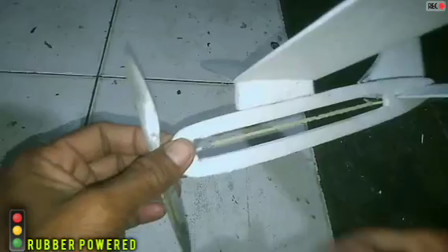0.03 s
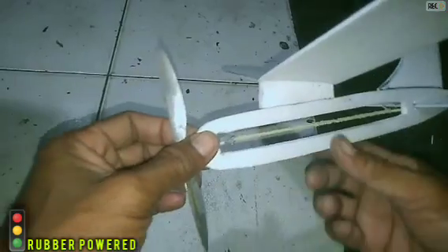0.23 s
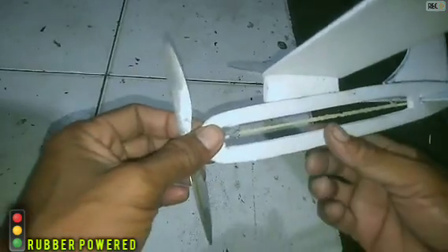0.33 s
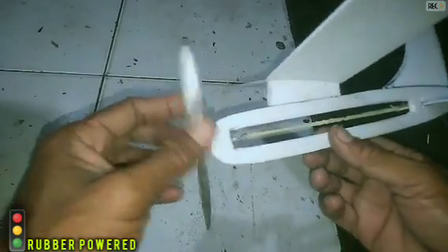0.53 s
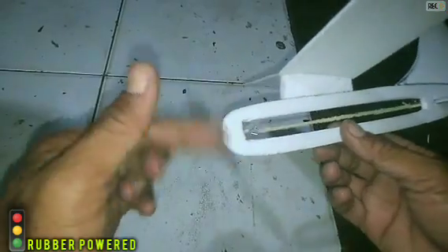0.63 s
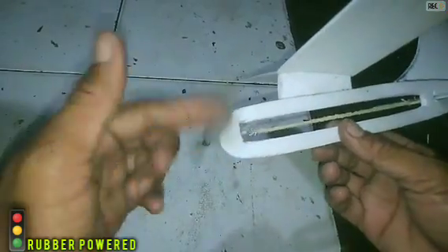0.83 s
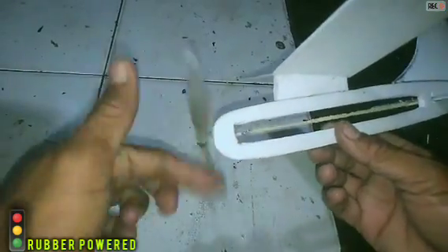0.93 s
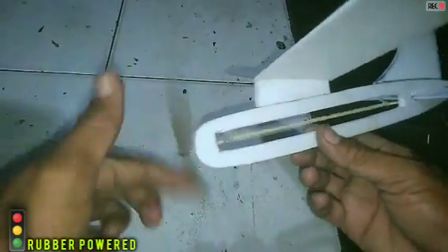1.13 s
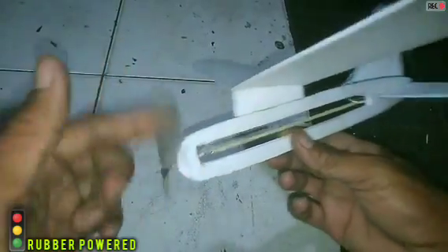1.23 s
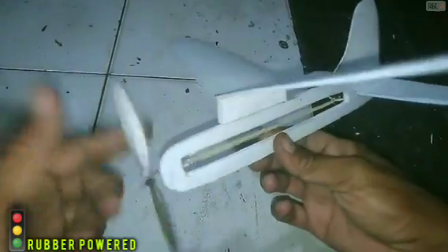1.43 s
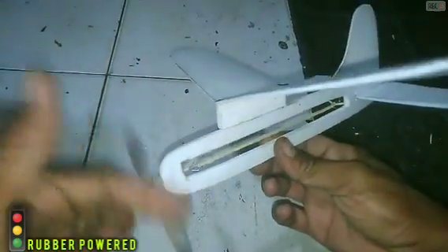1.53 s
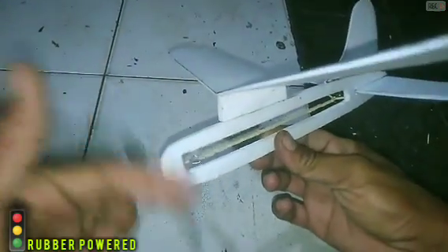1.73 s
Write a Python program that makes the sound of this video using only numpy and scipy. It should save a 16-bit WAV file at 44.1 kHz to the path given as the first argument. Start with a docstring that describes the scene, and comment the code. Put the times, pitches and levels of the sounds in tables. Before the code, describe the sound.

A small plastic propeller is flicked with short dry taps, close up in a quiet room. A tiny squeak and a deep handling bump come first, then fingers rub and the foam body briefly creaks around 0.6 seconds. The clearest taps land at about 0.75 and 1.4 seconds, with softer ones near 1.0, 1.2 and 1.7. Light finger rustles run between them over faint hiss.

```python
"""Flicking a foam plane's propeller

A small foam model plane is held close over a tiled floor in a quiet room. A finger flicks the plastic
propeller: short dry taps with a floor echo. Fingers slip and rustle on the foam body, the nose creaks
and the shaft gives one tiny squeak. Handling sends a subsonic bump through the faintly hissing mic."""
import sys
import numpy as np
from scipy import signal
from scipy.fft import rfft, irfft
from scipy.io import wavfile

SR = 44100
rng = np.random.default_rng(int(sys.argv[2]) if len(sys.argv) > 2 else 0)


def dump(signal):
    """Clip the signal to [-1, 1] and save it as 16-bit WAV at the path in sys.argv[1]."""
    limited = np.clip(np.atleast_2d(signal).T, -1, 1)
    pcm = np.round(limited * 32767).astype(np.int16)
    wavfile.write(sys.argv[1], SR, pcm)


N = 79380
T = np.arange(N) / SR


def from_db(db):
    """Decibels to gain."""
    return 10 ** (np.asarray(db) / 20)


def unit_rms(x):
    """Scale to an rms of 1."""
    return x / np.sqrt(np.mean(x ** 2) + 1e-20)


def cut(x, hz, kind="low", order=1):
    """Butterworth low- or high-pass."""
    return signal.sosfilt(signal.butter(order, min(hz, .45 * SR), kind, fs=SR, output="sos"), x)


def colour(x, spectrum):
    """Shape a steady noise with an EQ curve of (Hz, dB) points; rms 1."""
    hz, db = np.transpose(spectrum)
    bins = np.maximum(np.fft.rfftfreq(N, 1 / SR), 1)
    gain = from_db(np.interp(np.log(bins), np.log(hz), db))
    return unit_rms(irfft(rfft(x) * gain, N))


def ring(x, hz, t60):
    """One resonant mode that dies by 60 dB in t60 seconds."""
    radius, angle = np.exp(-np.log(1000) / (t60 * SR)), 2 * np.pi * hz / SR
    return signal.lfilter([.5, 0, -.5], [1, -2 * radius * np.cos(angle), radius ** 2], x + 1e-18)


def friction(slips_per_s=8500, spread_db=3.5):
    """Dense tiny slips of uneven size; rms 1."""
    sizes = from_db(spread_db * np.minimum(rng.exponential(1, N), 3)) * rng.choice([-1, 1], N)
    return unit_rms(sizes * (rng.random(N) < slips_per_s / SR))


# The noise bed's EQ. Each row: frequency in Hz, relative level in dB.
ROOM_TONE_EQ = [(20, -8.5), (60, -1), (105, -9), (150, -0.5), (210, -14), (420, -13), (800, -13),
                (1300, -17.5), (1900, -16), (2700, -18.5), (3600, -22.5), (6000, -31.5), (15000, -31)]


def room_tone():
    """Room rumble, microphone hiss and a faint steady whir in two narrow bands."""
    whir = 0
    for hz, width_hz, drive_db in [(2199, 49, 6), (2360, 23.4, -0.5)]:
        whir += from_db(drive_db) * ring(rng.standard_normal(N), hz, np.log(1000) / (np.pi * width_hz))
    air = colour(rng.standard_normal(N), ROOM_TONE_EQ)
    return from_db(-57.5) * air + from_db(-65.5) * unit_rms(whir)


# The handling rumble's fader. Each row: time in seconds, level in dB.
RUMBLE_FADER = [(0, -85), (.11, -86), (.16, -59.5), (.6, -56), (1.0, -57.5), (1.2, -59.5), (1.5, -64),
                (1.8, -57)]
# The slow drift of the microphone's zero. Each row: time in seconds, offset as a linear amplitude.
ZERO_DRIFT = [(0, -0.00016), (.14, 0.00079), (.45, -0.0052), (.62, -0.0012), (.8, 0.0017), (1.05, 0.0011),
              (1.4, -.002), (1.8, .001)]


def handling_noise(start_s=0.15, rise_s=0.023, fall_s=0.1):
    """Handling puts one subsonic bump and a low rumble on the microphone's drifting zero."""
    age = np.maximum(T - start_s, 0)
    bump = from_db(-20) * (1 - np.exp(-(age / rise_s) ** 2)) * np.exp(-age / fall_s)
    fader = from_db(np.interp(T, *np.transpose(RUMBLE_FADER)))
    rumble = fader * unit_rms(cut(rng.standard_normal(N), hz=92, order=2))
    return bump + rumble + np.interp(T, *np.transpose(ZERO_DRIFT))


# The bounce off the tiles. Each row: delay in seconds, level in dB against the direct sound.
FLOOR_ECHO = [(.0073, -26.5)]


def room(x, t60=0.22):
    """The floor throws back one close echo and the room adds a weak, dull tail."""
    echo = sum(from_db(db) * np.interp(T - delay, T, x, left=0) for delay, db in FLOOR_ECHO)
    tail = cut(rng.standard_normal(N) * np.exp(-np.log(1000) * T / t60), hz=2970)
    return x + echo + from_db(-21) * signal.fftconvolve(x, tail / np.linalg.norm(tail))[:N]


# The foam body's modes. Each row: frequency in Hz, relative level in dB, ring time (t60) in seconds,
# relative level in dB when the nose creaks.
FOAM_MODES = [(274, -3, 0.017, -17), (539.4, -6.5, 0.058, -20), (765, -5.5, 0.041, -30),
              (1158, -4.5, 0.043, 0.5), (1565, 0.5, 0.011, 0), (1789, 2, 0.0049, -7),
              (2092, 1.5, 0.0073, 0.5), (2520, -6, 0.018, -16), (2968, -11, 0.046, -8),
              (3013, -24, .035, -3), (3790, -15.5, 0.077, -10.5), (4190, -35, 0.07, -8.5),
              (4450, -20, 0.07, -20)]


def foam_body(x):
    """Slips ring the body's modes, and the soft foam passes little treble."""
    click = np.arange(N) == 0
    modes = sum(from_db(db) * ring(click, hz, t60) for hz, db, t60, _ in FOAM_MODES)
    knock = cut(modes, hz=4750, order=2)
    return signal.fftconvolve(x, knock / np.linalg.norm(knock))[:N]


def shaft_squeak(hz=786, end_s=0.017, release_s=0.007):
    """A short stick-slip note with a little rasp, stopping as the shaft comes to rest."""
    held = np.clip((end_s - T) / release_s, 0, 1)
    rasp = from_db(-12) * foam_body(held * friction())
    return from_db(-40.5) * (held * np.sin(2 * np.pi * hz * T) + rasp)


# The EQ of the creak's dry hiss. Each row: frequency in Hz, relative level in dB.
CREAK_HISS_EQ = [(1000, 6.5), (2500, 11.5), (4300, 11.5), (5600, 4), (8000, -3.5), (9100, 7), (10100, -2.5),
                 (12300, -1.5), (13500, -8), (14500, 2), (15800, -3.5)]


def nose_creak(start_s=0.5918, length_s=0.013, grip_s=0.0044, release_s=0.0053, waver_depth=0.0072):
    """As the pinch slides off the nose, gritty friction takes hold, makes the foam sing and lets go."""
    age = np.maximum(T - start_s, 0)
    release = np.exp(-np.maximum(age - length_s, 0) / release_s)
    singing = (1 - np.exp(-age / grip_s)) * release
    sliding = singing * release  # the friction dies twice as fast as the tone
    voice = 0
    for hz, _, _, db in FOAM_MODES:
        waver = waver_depth * unit_rms(cut(rng.standard_normal(N), hz=200, order=2))
        voice += from_db(db) * np.sin(2 * np.pi * np.cumsum(hz * (1 + waver)) / SR)
    slips = friction()
    grit = from_db(-40.5) * foam_body(sliding * slips)
    hiss = from_db(-42) * sliding * colour(slips, CREAK_HISS_EQ)
    return from_db(-40) * singing * voice + grit + hiss


# Skin rubbing on foam and blade. Each row: peak time, rise and fall in seconds, foam send in dB,
# dry hiss send in dB, rasp pitch in Hz, rasp send in dB.
RUB_CUES = [(0.552, 0.0085, 0.0089, -12, -33, 2060, -8.5), (0.5853, 0.0055, 0.0039, -7.5, -30, 2880, -10),
            (0.649, 0.01, 0.01, -22, -23, 2140, -25), (0.698, 0.011, 0.0075, -15.5, -11.5, 2800, -10.5),
            (0.875, 0.029, 0.016, -16.5, -14.5, 4386, -23.5),
            (0.906, 0.0093, 0.0064, -14.5, -22, 2620, -8.5), (0.979, 0.011, 0.01, -16.5, -19, 1423, -17),
            (1.078, 0.0056, 0.004, -22, -7.5, 4400, -18), (1.080, 0.013, 0.0054, -17.5, -16.5, 1565, -15),
            (1.096, 0.0067, 0.0079, -15, -8.5, 2900, -14), (1.160, 0.021, 0.018, -21.5, -18, 8750, -25.5),
            (1.276, 0.0024, 0.0085, -16.5, -24, 2700, -17.5), (1.452, 0.017, 0.022, -23, -26, 1700, -25),
            (1.541, 0.018, 0.011, -16.5, -12.5, 2700, -20), (1.618, 0.0084, 0.0058, -21, -17, 2680, -19),
            (1.647, 0.0055, 0.0087, -19.5, -17, 1660, -11), (1.775, 0.014, 0.0099, -22, -37, 2780, -22)]
# The EQ of the skin's dry hiss. Each row: frequency in Hz, relative level in dB.
SKIN_HISS_EQ = [(300, 2), (1500, -5), (3700, -5), (4450, 12), (5400, -2), (7500, 3), (9200, 7),
                (10300, 5.5), (12300, 2), (13600, -1), (14400, 4), (16000, -8)]


def finger_rubs(rasp_cycles=36):
    """Each rub swells and fades; its slips ring the foam, rasp at one pitch and crackle at the skin."""
    force, hiss, rasp = np.zeros((3, N))
    slips = friction()
    for peak_s, rise_s, fall_s, foam_db, hiss_db, hz, rasp_db in RUB_CUES:
        stroke = np.exp(-((T - peak_s) / np.where(T < peak_s, rise_s, fall_s)) ** 2)
        force += from_db(foam_db) * stroke
        hiss += from_db(hiss_db) * stroke
        # Each rub favours one resonance, set by where the finger bears.
        resonance = cut(ring(slips, hz, t60=rasp_cycles / hz), 2 * hz, order=2)
        rasp += from_db(rasp_db) * stroke * unit_rms(resonance)
    # Skin ridges catch less often than the foam slips.
    crackle = colour(friction(slips_per_s=3500, spread_db=3), SKIN_HISS_EQ)
    foam = foam_body(force * friction())
    return from_db(-37) * foam + from_db(-42) * rasp + from_db(-49.5) * hiss * crackle


# The propeller's modes on its shaft. Each row: frequency in Hz, relative level in dB,
# ring time (t60) in seconds.
PROPELLER_MODES = [(251, 6, 0.042), (311.2, 0, 0.11), (547.6, .6, 0.047), (730, -6, 0.025), (797, -2, .034),
                   (1175, -26, 0.068), (1415, -5, 0.013), (1550, -11.5, 0.07), (1748, -13.5, 0.026),
                   (1873, 3, 0.0013), (2116, 4.5, .016), (2610, -1.5, 0.015), (2870, -2.5, 0.015),
                   (2970, -7.5, 0.036), (3534, -11.5, 0.023), (4110, -5.5, 0.0091), (5000, -23, 0.018)]


def blade_ring(t, pitch, buzz_s=0.0024, lag_at_1khz_s=0.00016, spread_db=1.7):
    """The struck, loose blade buzzes briefly at full strength before its modes die away."""
    modes = 0
    for hz, db, t60 in PROPELLER_MODES:
        age = np.maximum(t - lag_at_1khz_s * np.sqrt(1000 / hz), 0)  # low bending waves travel slower
        decay = np.exp(-np.log(1000) * np.maximum(age - buzz_s, 0) / t60)
        modes += from_db(db + rng.normal(0, spread_db)) * decay * np.sin(2 * np.pi * hz * pitch * age)
    return modes


# Finger meets blade. Each row: start in seconds, relative level in dB, contact brightness (low-pass)
# in Hz, pitch as a ratio, crack trim in dB.
TAP_CUES = [(0.2112, -26, 9000, 1, 3), (0.6706, -19, 7000, 1.05, 0), (0.7428, 0, 3800, 1, 0),
            (0.7707, -32, 12000, 1, 12), (0.7865, -21, 2400, .97, -3), (0.8815, -25, 9000, 1.05, 8),
            (0.9925, -19, 2500, .98, -4), (1.0751, -29, 9000, 1.06, 6), (1.0945, -24, 7000, 1.02, 4),
            (1.2052, -16, 3000, 1.02, -2), (1.3939, -1.7, 2850, 1.013, 0), (1.6657, -15, 2900, .99, -2)]


def propeller_taps(crack_rise_s=0.00067, crack_fall_s=0.0028):
    """Each flick rings the blade and adds a short crack, which builds up as the fingertip is soft."""
    track, t = np.zeros(N + SR), T[:SR // 5]
    burst = (1 - np.exp(-t / crack_rise_s)) * np.exp(-t / crack_fall_s)
    for start_s, db, contact_hz, pitch, crack_db in TAP_CUES:
        blade = cut(blade_ring(t, pitch), contact_hz, order=2)
        crack = cut(rng.standard_normal(len(t)) * burst, hz=3200, kind="high", order=2)
        tap = blade + from_db(crack_db - 0.5) * cut(crack, contact_hz)
        start = int(start_s * SR)
        track[start:start + len(t)] += from_db(db - 32.5) * tap
    return cut(track[:N], hz=807, kind="high", order=2)  # the taps carry little bass


def scene():
    """The handled plane in its room, over handling noise and room tone."""
    plane = propeller_taps() + finger_rubs() + nose_creak() + shaft_squeak()
    return (room(plane) + handling_noise() + room_tone())[None]


def record(dry, cutoff_hz=15800):
    """A steep low-pass takes off the very top."""
    return signal.sosfilt(signal.ellip(10, .1, 70, cutoff_hz, fs=SR, output="sos"), dry)


dry = scene()
out = record(dry)
dump(out)
```